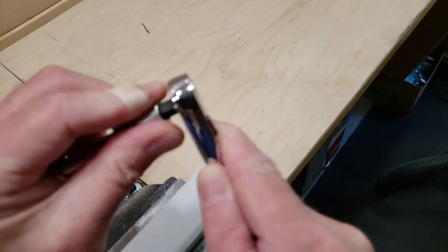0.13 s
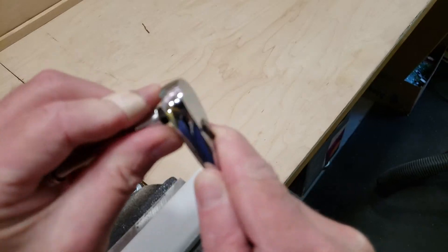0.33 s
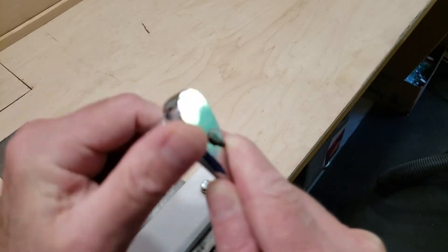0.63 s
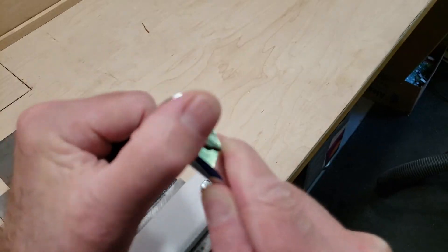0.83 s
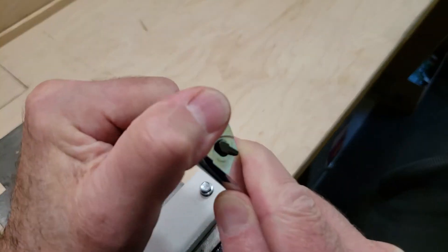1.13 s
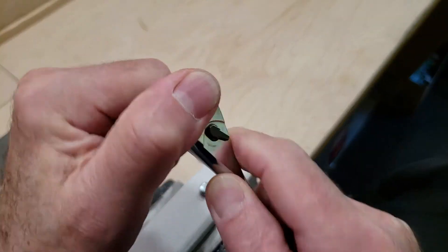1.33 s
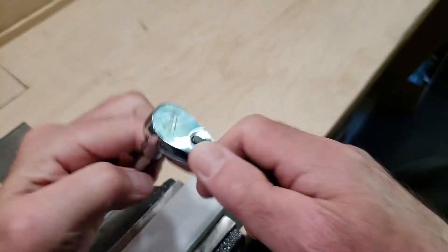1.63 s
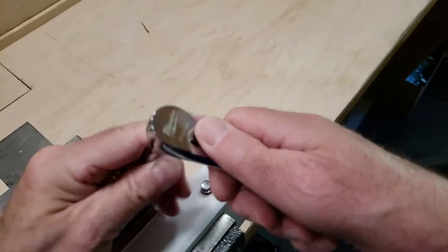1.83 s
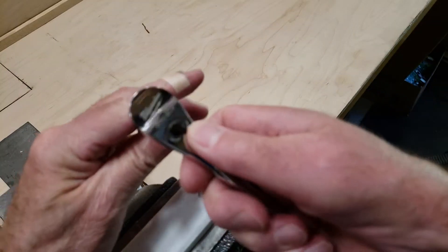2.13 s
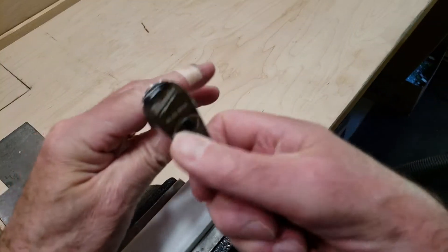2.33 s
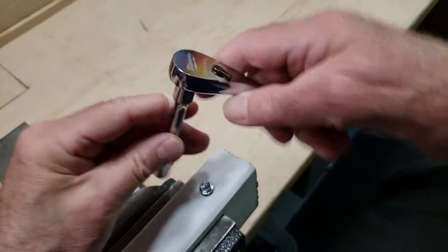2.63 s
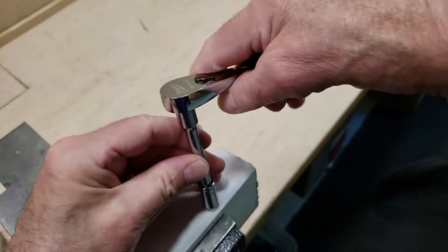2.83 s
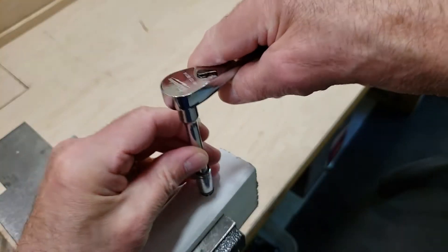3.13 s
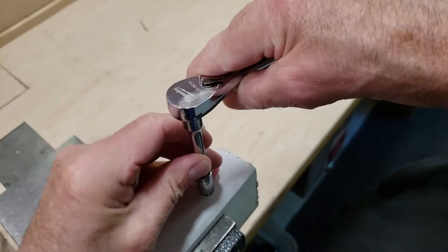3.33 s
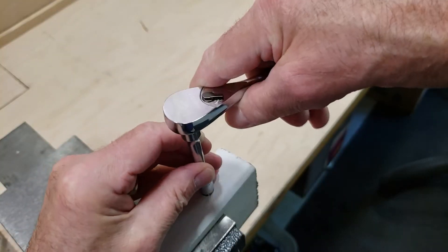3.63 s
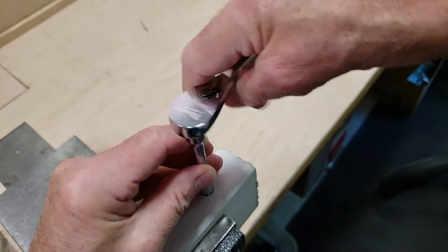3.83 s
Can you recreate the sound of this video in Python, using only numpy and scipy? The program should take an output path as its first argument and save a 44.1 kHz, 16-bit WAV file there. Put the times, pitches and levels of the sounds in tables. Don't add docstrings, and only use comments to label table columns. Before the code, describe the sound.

A small steel ratchet, very close, slightly right. Sharp bright ticks at 0.2, 1.0 and, loudest, 2.25 seconds, with barely audible finger touches between. The socket knocks firmly on a bolt and metal block at 2.8, taps at 2.86, scrapes faintly, then knocks hard around 3.16; dull settling at 3.3. From 3.85, eleven quick crisp pawl clicks run to the end. Small room, low hum, soft draughts.

```python
import sys
import numpy as np
from scipy import signal
from scipy.fft import rfft, irfft
from scipy.io import wavfile
from scipy.ndimage import uniform_filter1d

SR = 44100
rng = np.random.default_rng(int(sys.argv[2]) if len(sys.argv) > 2 else 0)


def field_ratio(decibels):
    return 10 ** (np.asarray(decibels, dtype=float) / 20)


def generate_wav(sig):
    pcm = np.round(np.clip(np.atleast_2d(sig).T, -1, 1) * 32767).astype(np.int16)
    wavfile.write(sys.argv[1], SR, pcm)


N = 176400

# freq_hz, level_db per Hz
AIR_SPECTRUM = [(12, -16), (25, -7.5), (200, -15), (450, -20), (900, -29), (2500, -32.5), (13000, -37.5),
                (16500, -37)]
# freq_hz, width_hz, rise_db
MACHINE_HUM = [(140.7, 30, 17), (257.2, 29, 15.5), (285.7, 12, 8.5), (377, 40, 8)]
# freq_hz, correlation (-1 to 1)
AIR_LIKENESS = [(60, 0.75), (240, 1), (950, -0.096), (3770, -0.22), (15000, -0.01)]
# freq_hz, level_db
AIR_BALANCE = [(60, 0.5), (240, -5), (950, 0.0), (3770, -2.5), (15000, -0.5)]
# start_s, level_db, ring_hz, rattle_ms, ring_share_db
FINGER_TICKS = [(0.183, -28.5, 7550, 4.5, -3), (0.1868, -50, 6400, 2, -1), (.4324, -57, 1660, 1.5, -9),
                (0.917, -60, 4950, 17, 17), (.9245, -52, 3270, 2, 1), (1.0114, -31.5, 4830, 1.1, 0),
                (1.021, -54.5, 2300, 29, 20), (1.1305, -55, 3400, 2, 13), (1.3984, -58.5, 2960, 3, 20),
                (1.4196, -52.5, 5130, 3.2, -9), (1.5357, -55.5, 4980, 2.8, 1), (1.892, -59, 3700, 17, -2),
                (2.0395, -58.5, 3680, 4.7, 6), (2.2444, -48, 6700, 5.3, 0), (2.2516, -22, 6350, 1.3, -11),
                (2.252, -19, 11670, 2.7, 1.5), (2.4367, -50, 10900, 3, 2), (2.476, -55.5, 3830, 6, -10)]
# freq_hz, level_db
TICK_COLOUR = [(500, -16), (1500, -3), (3500, 11.5), (6500, 11.5), (9500, -2.5), (12000, 5), (16500, -44.5)]
# delay_ms, left_db, right_db
FIRST_ECHOES = [(.45, -12, -20), (1.1, -20, -15), (1.9, -12, -20), (2.8, -17, -17), (3.7, -14, -20)]
# freq_hz, t60_s
ROOM_DECAY = [(250, 1), (1000, 0.31), (4000, .3), (9000, 0.17), (15000, 0.26)]
# middle_s, length_s, level_db
DRAUGHTS = [(1.357, 0.084, -56), (1.543, 0.11, -62), (1.764, 0.088, -58), (1.863, 0.047, -53),
            (2.272, 0.03, -67)]
# start_s, level_db, crack_share_db, deep_share_db, crack_hz
SOCKET_KNOCKS = [
    (2.7790, -11.5, -3.5, -5, 13000),
    (2.857, -18, 1.5, -2, 7800),
    (3.1547, -16.5, 8, 3, 7460),
    (3.1635, -10.5, 2.3, -7.4, 7600),
    (3.3121, -35, 1, 16.5, 2300),
    (3.4431, -65.5, 3, 11, 1900),
    (3.4755, -63, -2, 11, 4300),
]
# freq_hz, level_db, t60_s
BLOCK_MODES = [(709.5, -18, 0.19), (987, -14.5, 0.16), (1030, -15.5, 0.076), (1362.5, -2.5, 0.069),
               (1808, -4, .04), (1933, -8.5, 0.024), (2737, -3, 0.024), (2903, -8, 0.038),
               (3400, -9, 0.051), (3776, 2.5, 0.026), (4163, -1.5, 0.031), (4494, -22, 0.027),
               (5190, -13, 0.063), (7270, -26, 0.07)]
# freq_hz, level_db
METAL_CLATTER = [(550, -21), (850, -4.5), (1500, -11.5), (2300, -14.5), (4000, -3.3), (6000, -11),
                 (8000, -8), (16500, -32.5)]
# freq_hz, level_db, t60_s
BENCH_MODES = [(99, -30.5, 0.15), (245, -32, 0.25), (308, -32, 0.17), (456, -36, .1)]
# start_s, length_s, level_db, squeak_hz
STEEL_SCRAPES = [
    (2.973, 0.083, -51, 7440),
    (3.33, 0.32, -73, 900),
    (3.575, 0.35, -83.5, 5000),
]
# start_s, level_db
TOOTH_CLICKS = [(3.8489, -27), (3.8709, -22), (3.8857, -20.5), (3.8985, -18.5), (3.9091, -18.5),
                (3.9201, -19), (3.9331, -22), (3.9495, -20), (3.9689, -22), (3.9839, -22), (3.9959, -21.5)]
# freq_hz, width_hz, level_db
PAWL_MODES = [(1730, 300, -11), (3130, 400, -3), (4220, 260, 1.85), (5700, 400, 1), (7430, 600, -1),
              (8500, 200, -3), (11900, 2400, -6.5), (13300, 310, -5.5)]

SHORT, LONG = 900, 9000
DEEP_BELOW_HZ = 2300


def evened(x):
    return x / np.sqrt(np.mean(x ** 2) + 1e-20)


def peaked(x):
    return x / np.max(abs(x))


def read(points, hz):
    f, value = np.transpose(points)
    return np.interp(np.log(hz + 1), np.log(f + 1), value)


def add(mix, s, sound):
    part = mix[round(s * SR):][:len(sound)]
    part += sound[:len(part)]


def late(x, samples):
    return np.pad(x, (samples, 0))[:len(x)]


def ring(x, hz, width_hz):
    r = np.exp(-np.pi * abs(width_hz) / SR)
    pole = r * np.exp(2j * np.pi * hz / SR)
    return 2 * signal.lfilter([1 - r], [1, -pole], x).real


def air():
    level_db = -62.5
    frames, hz = N // 512 + 5, np.fft.rfftfreq(2048, 1 / SR)
    a, b, c, d, patches = rng.standard_normal((frames, 1025, 5)).T
    patches = uniform_filter1d(patches, size=5, axis=0)
    patches = evened(uniform_filter1d(patches, size=6, axis=1))
    patches_db = patches * (2.1 + 0.37 * (hz < 600))[:, None]
    shape_db = read(AIR_SPECTRUM, hz)
    for f, width, rise_db in MACHINE_HUM:
        shape_db = shape_db + rise_db / (1 + ((hz - f) / width * 2) ** 2)
    same = np.clip(read(AIR_LIKENESS, hz), -1, 1)[:, None]
    lean = field_ratio(read(AIR_BALANCE, hz) / 2)[:, None]
    left = a + 1j * b
    right = same * left + np.sqrt(1 - same ** 2) * (c + 1j * d)
    z = np.array([left * lean, right / lean]) * field_ratio(shape_db[:, None] + patches_db)
    return field_ratio(level_db) * evened(signal.istft(z, nperseg=2048, noverlap=1536)[1][:, :N])


def rattle(ms):
    t = np.arange(SHORT) / SR
    size, luck = rng.random((2, SHORT))
    cluster = (size - .5) * luck ** 2
    cluster *= np.exp(-t * 2000 / ms) * np.minimum(t / .0002, 1)
    return peaked(cluster) + 1.6 * (np.arange(SHORT) == 8)


def ticks():
    ring_width_hz = 453
    out, hz = np.zeros(N), np.fft.rfftfreq(SHORT, 1 / SR)
    for s, db, ring_hz, ms, ring_db in FINGER_TICKS:
        drive = rattle(ms)
        snap = evened(irfft(rfft(drive) * field_ratio(read(TICK_COLOUR, hz))))
        part = evened(ring(drive, ring_hz, ring_width_hz))
        add(out, s, field_ratio(db) * peaked(snap + field_ratio(ring_db) * part))
    return out


def room(x):
    start_s, gap = .005, 20
    taps = np.zeros((2, SR // 2))
    at = np.arange(round(start_s * SR), SR // 2 - gap, gap)
    at = at + rng.integers(0, gap, (2, len(at)))
    np.put_along_axis(taps, at, rng.choice([-1., 1.], at.shape), 1)
    taps[1] += 0.59 * taps[0]
    hz, t, z = signal.stft(taps, SR, nperseg=256)
    decay = field_ratio(-60 * t / read(ROOM_DECAY, hz)[:, None])
    tail = signal.istft(z * decay, SR, nperseg=256)[1]
    tail = tail / np.linalg.norm(tail, axis=1)[:, None]
    return signal.fftconvolve(x[None], tail, axes=1)[:, :N]


def draughts():
    t = np.arange(N) / SR
    band = signal.butter(2, [18, 69], "band", fs=SR, output="sos")
    low = signal.sosfilt(band, rng.standard_normal((2, N)))
    swell = sum(field_ratio(db) * np.exp(-((t - s) / length * 2) ** 2) for s, length, db in DRAUGHTS)
    return evened(low) * swell * field_ratio([[-8], [3]])


def modes(table, deep_db=0, hold=1):
    wobble, swell_turns, strike_spread_db, pitch_spread = 0.84, 8.5, 1.0, 0.0066
    t = np.arange(LONG) / SR
    chance = rng.standard_normal((len(table), 2))
    waver = uniform_filter1d(rng.standard_normal((len(table), LONG)), size=500, axis=1)
    waver = 1 + wobble * evened(waver)
    out = np.zeros(LONG)
    for (hz, db, t60), (a, b), w in zip(table, chance, waver):
        strike_db = db + strike_spread_db * a + deep_db * (hz < DEEP_BELOW_HZ)
        swell = 1 - np.exp(-t * hz / swell_turns)
        tone = np.sin(2 * np.pi * hz * (1 + pitch_spread * b) * t)
        out += field_ratio(strike_db - 60 * t / (t60 * hold)) * w * swell * tone
    return out


def metal(deep_db, hold=1):
    clatter_db, bright_t60_s, deep_t60_s, deep_rise_s = 1, 0.042, 0.12, 0.0049
    t, hz = np.arange(LONG) / SR, np.fft.rfftfreq(LONG, 1 / SR)
    z = evened(abs(field_ratio(read(METAL_CLATTER, hz)))) * rfft(rng.standard_normal(LONG))
    deep = irfft(z * (hz < DEEP_BELOW_HZ)) * field_ratio(deep_db - 60 * t / (deep_t60_s * hold))
    deep *= 1 - np.exp(-t / deep_rise_s)
    bright = irfft(z * (hz >= DEEP_BELOW_HZ)) * field_ratio(-60 * t / (bright_t60_s * hold))
    body = peaked(modes(BLOCK_MODES, deep_db, hold)) * max(1, field_ratio(deep_db))
    return body + field_ratio(clatter_db) * (deep + bright) / 2


def knocks():
    crack_ms, blow_ms, wide_db = 3.6, .12, -3
    out = np.zeros(N)
    for s, db, crack_db, deep_db, crack_hz in SOCKET_KNOCKS:
        drive = rattle(crack_ms)
        focus = evened(ring(drive, crack_hz, 0.12 * crack_hz))
        wide = evened(ring(ring(drive, 0.98 * crack_hz, crack_hz), crack_hz, 0.56 * crack_hz))
        add(out, s, field_ratio(db + crack_db) * peaked(focus + field_ratio(wide_db) * wide))
        blow = signal.oaconvolve(rattle(blow_ms), metal(deep_db))
        add(out, s, field_ratio(db) * peaked(blow))
    return out


def thuds():
    out = np.zeros(N)
    for s, db, *_ in SOCKET_KNOCKS:
        add(out, s, field_ratio(db) * modes(BENCH_MODES))
    return out


def scrapes():
    slips_per_s, squeak_db, groan_hz, groan_db = 8800, -2, 890, -4
    out, t = np.zeros(N), np.arange(SR // 2) / SR
    for s, length, db, squeak_hz in STEEL_SCRAPES:
        slips = rng.standard_normal(len(t)) * (rng.random(len(t)) < slips_per_s / SR)
        slips *= np.sin(np.pi * np.minimum(t / length, 1) ** 0.52) ** 1.8
        slips = ring(ring(slips, 3500, 9000), 3500, 9000)
        body = evened(signal.oaconvolve(slips, metal(1.1, 0.31))[:len(t)])
        squeak = evened(ring(ring(slips, squeak_hz, 1300), squeak_hz, 1300))
        groan = evened(ring(ring(slips, groan_hz, 260), groan_hz, 260))
        stroke = body + field_ratio(squeak_db) * squeak + field_ratio(groan_db) * groan
        add(out, s, field_ratio(db) * np.sqrt(2 * length) * stroke)
    return out


def ratchet():
    snap_ms, bounce_ms, bounce_db, widen_hz = .3, 0.61, -2.5, 900
    teeth_db, block_db = 4, -7
    out = np.zeros(N)
    body = metal(-6, hold=.5)
    for s, db in TOOTH_CLICKS:
        drive = peaked(rattle(snap_ms))
        bounce_s = bounce_ms / 1000 * rng.uniform(0.73, 1.6)
        add(drive, bounce_s, field_ratio(bounce_db) * peaked(rattle(snap_ms)))
        snap = np.zeros(SHORT)
        for k, (hz, width, mode_db) in enumerate(PAWL_MODES):
            snap += (-1) ** k * field_ratio(mode_db) * ring(drive, hz, width + widen_hz)
        add(out, s, field_ratio(db + teeth_db) * peaked(snap))
        add(out, s, field_ratio(db + teeth_db + block_db) * peaked(signal.oaconvolve(drive, body)))
    return out


def scene():
    right_db, room_db, room_right_db, left_lag = 2.5, -10, .6, 3
    tool = ticks() + knocks() + ratchet() + scrapes()
    low_cut = signal.butter(4, 554, "high", fs=SR, output="sos")
    tool = signal.sosfilt(low_cut, tool) + thuds()
    tool = tool - 0.47 * signal.lfilter(*signal.iirpeak(2300, 5.5, SR), tool)
    direct = np.array([late(tool, left_lag), tool])
    near = direct.copy()
    for ms, echo_left_db, echo_right_db in FIRST_ECHOES:
        near += field_ratio([[echo_left_db], [echo_right_db]]) * late(tool, round(ms * SR / 1000))
    near = near * field_ratio([[-right_db], [right_db]])
    far = field_ratio(room_db) * room(tool) * field_ratio([[-room_right_db], [room_right_db]])
    return near + far + air() + draughts()


def roll_off(x):
    return signal.sosfilt(signal.butter(12, 16860, fs=SR, output="sos"), x)


def record(dry):
    soft = signal.sosfilt(signal.butter(8, 16000, fs=SR, output="sos"), dry)
    return roll_off(soft)


dry = scene()
out = record(dry)
generate_wav(out)
```